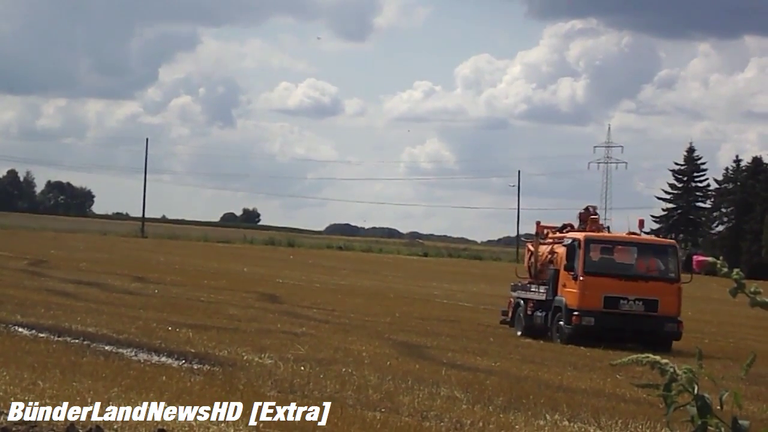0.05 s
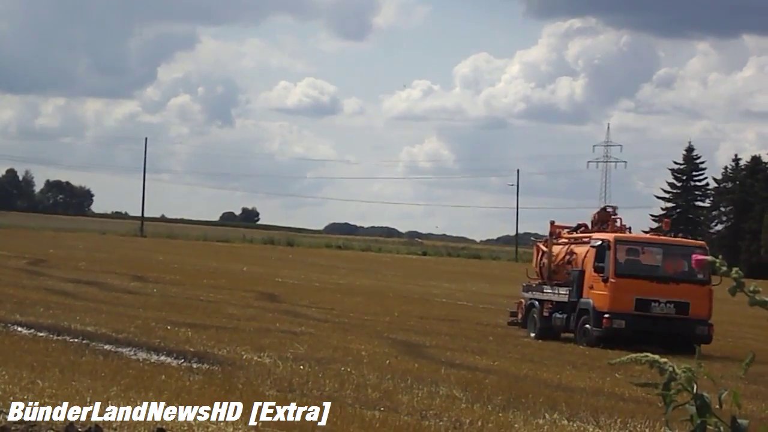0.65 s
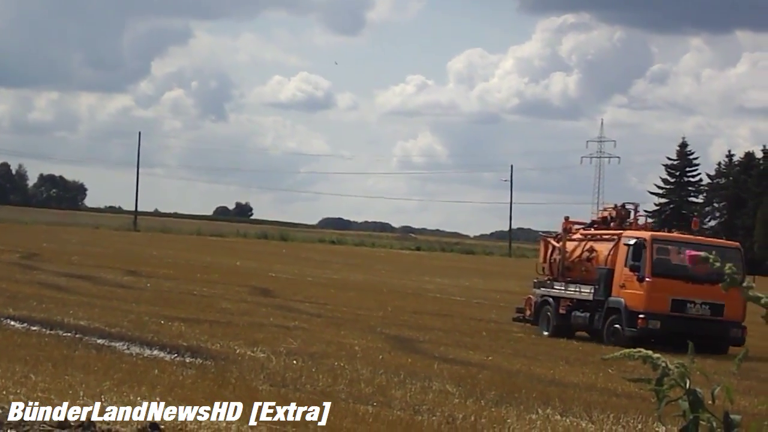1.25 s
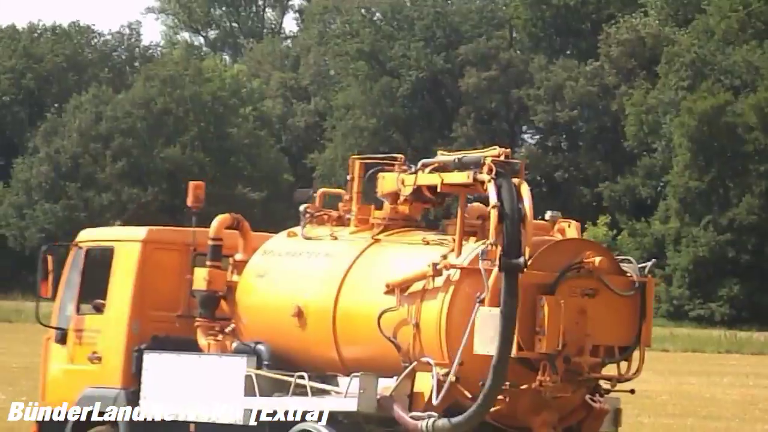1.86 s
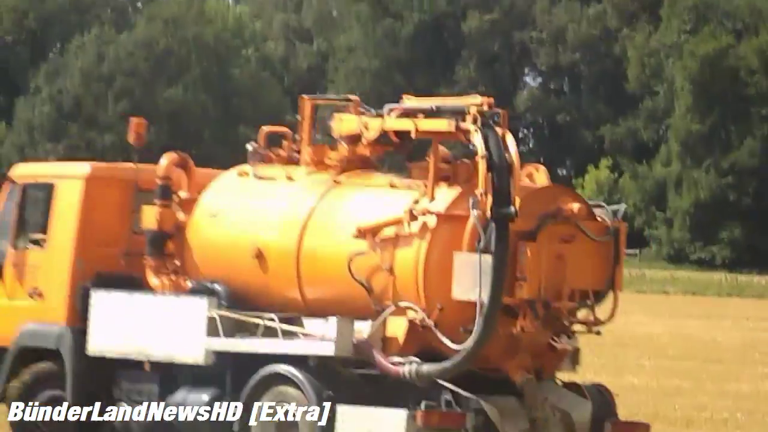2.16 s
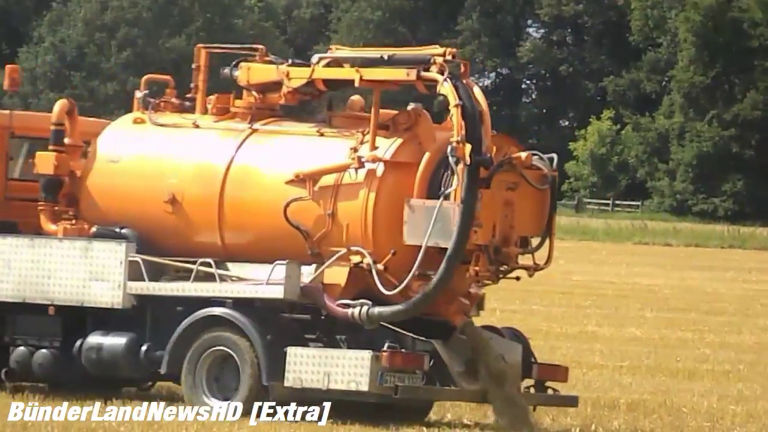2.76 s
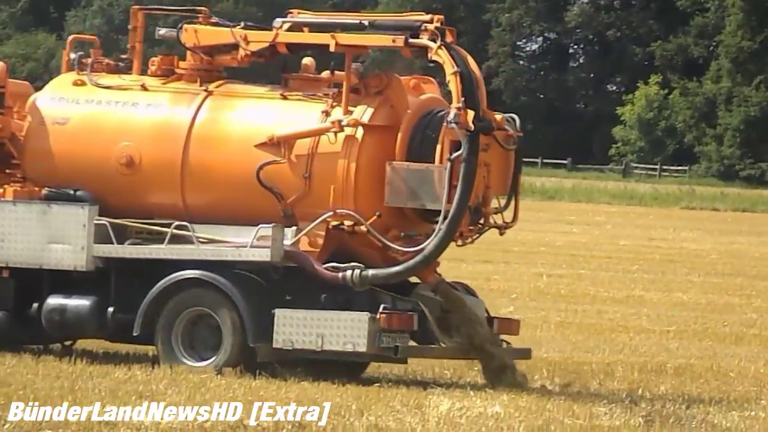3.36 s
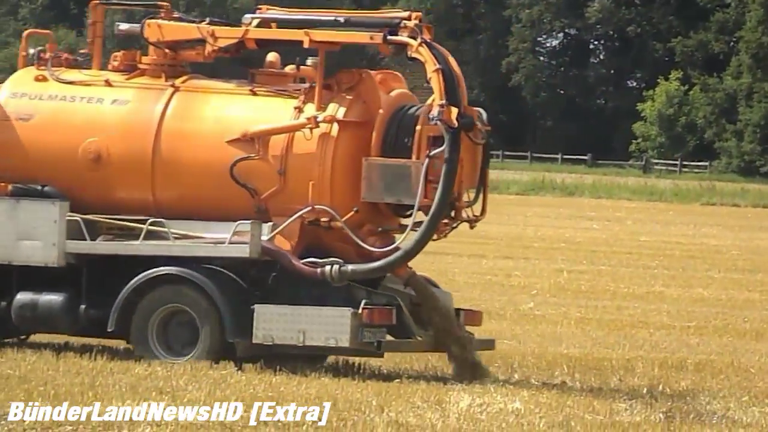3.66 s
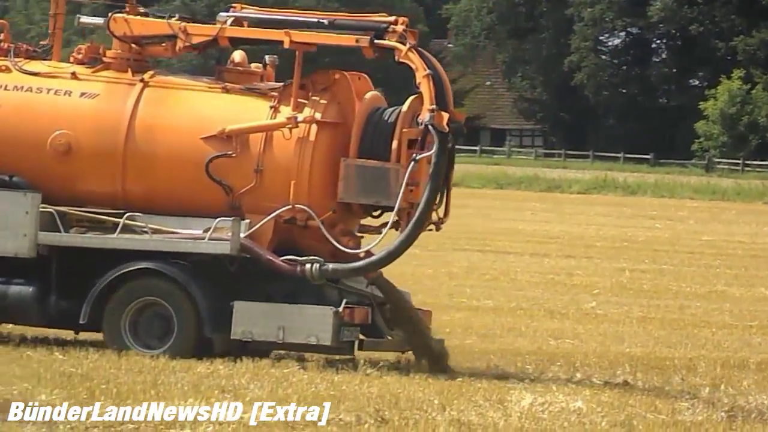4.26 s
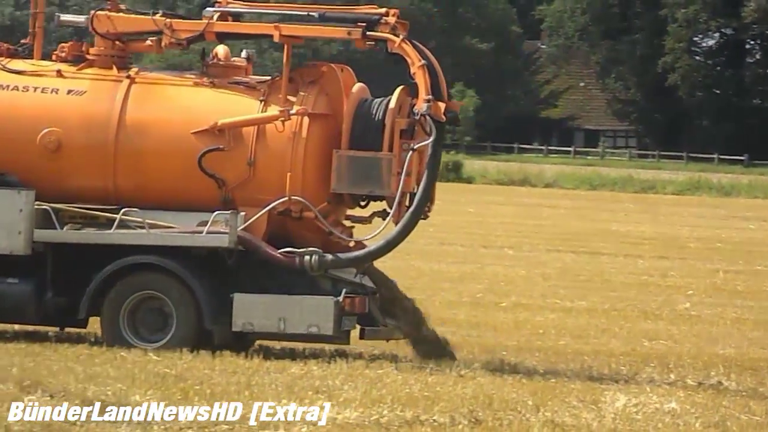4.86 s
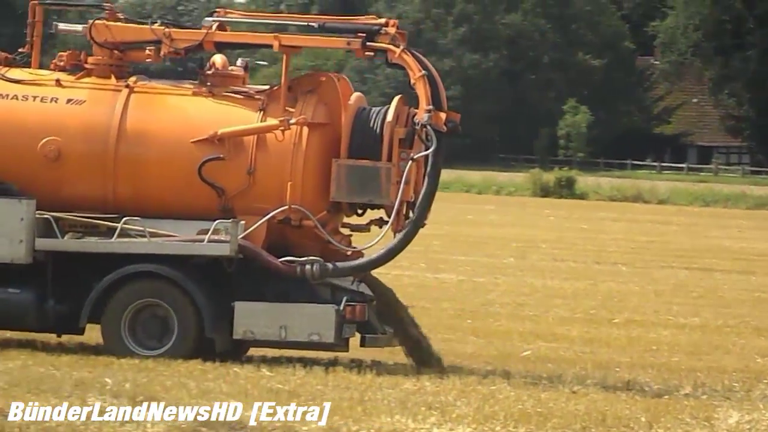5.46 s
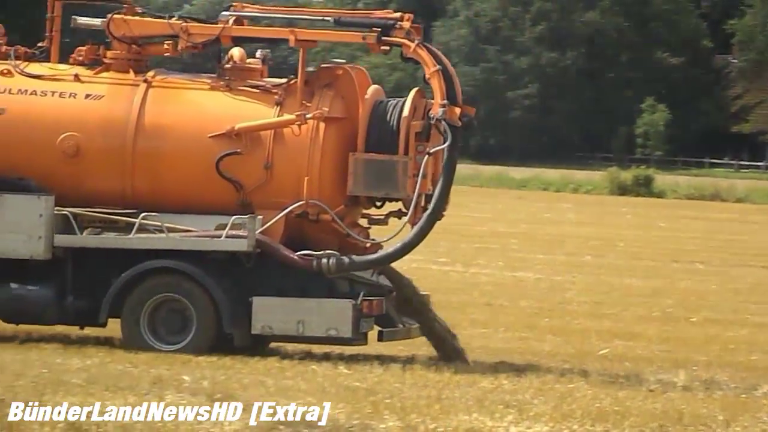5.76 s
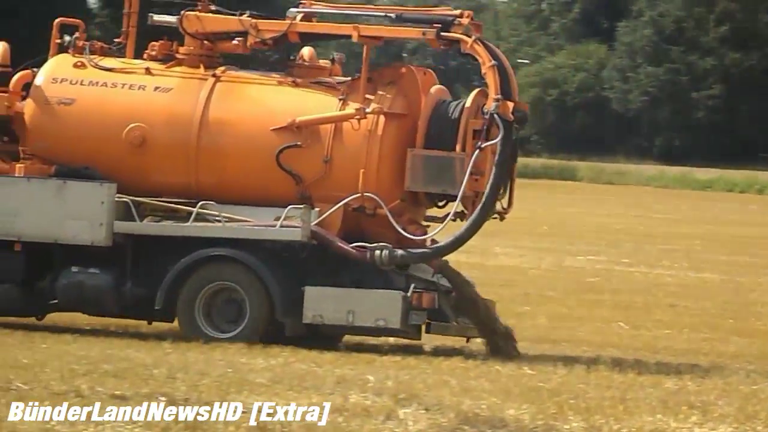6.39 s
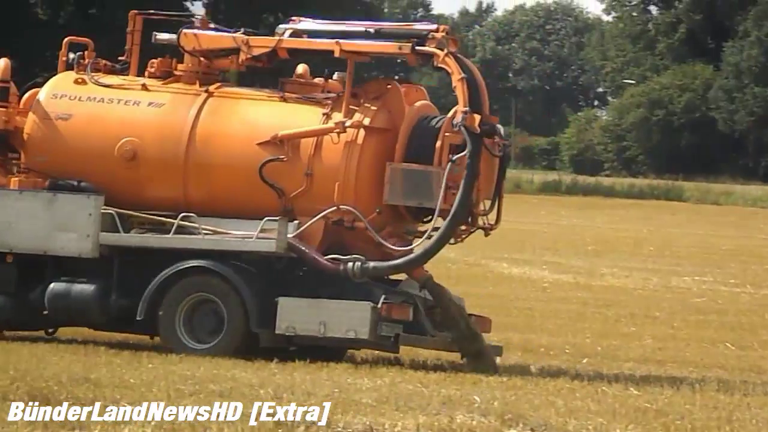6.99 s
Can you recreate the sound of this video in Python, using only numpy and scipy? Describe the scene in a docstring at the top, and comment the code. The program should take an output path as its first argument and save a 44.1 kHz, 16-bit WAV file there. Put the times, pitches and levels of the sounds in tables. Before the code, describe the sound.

A diesel tanker truck drones far across a field, then after a brief silence runs close by, rattling and splashing slurry while crickets rasp.

```python
"""Diesel engine of a slurry tanker crawling over stubble: heard from afar, then, after 0.5 s of silence, near.
Exhaust drones on multiples of the crank speed; firings knock the block and rattle loose metal.
The geared vacuum pump hums as its vanes chop the air; rubbing parts squeal.
Near, slurry splashes on the ground. Bush-crickets rasp their wings in the grass close by."""
import sys
import numpy as np
from scipy import signal
from scipy.fft import rfft, irfft, next_fast_len
from scipy.io import wavfile

SR = 44100
rng = np.random.default_rng(int(sys.argv[2]) if len(sys.argv) > 2 else 0)


def dump(signal):
    """Clip the signal to [-1, 1] and save it as 16-bit WAV at the path in sys.argv[1]."""
    limited = np.clip(np.atleast_2d(signal).T, -1, 1)
    pcm = np.round(limited * 32767).astype(np.int16)
    wavfile.write(sys.argv[1], SR, pcm)


N = 318843
T, HZ = np.arange(N) / SR, np.fft.rfftfreq(N, 1 / SR)
FAR_S, NEAR_S = (0, 1.7745), (2.2745, 7.24)  # start, end
PASS_MID_S, PASS_LENGTH_S = 4.24, 1.27
CRUISE_REV_PER_S, PUMP_RATIO = 23, 5.625
FITTING_HZ, FITTING_WIDTH_HZ = 5255, 169

# crank speed, sagging and recovering on soft ground: t/s, speed/(rev/s)
CRANK_SPEED = [(0, 22.9), (0.5, 22.95), (0.75, 23.15), (1.5, 23.25), (2.3, 23.05), (2.82, 22.98),
               (3.15, 23.5), (3.52, 22.5), (3.87, 23.55), (4.05, 23.7), (4.92, 22.45), (5.45, 22.65),
               (5.97, 22.42), (6.5, 23.02), (6.68, 23.42), (7.05, 23.06)]
# exhaust tones: order (multiple of crank speed)
ORDERS = [6, 7, 8, 9.5, 10.5, 12, 13, 16, 20, 22, 24, 26.5, 29, 30, 34]
# per order: level/dB
FAR_DRONE_DB = [-77, -89, -85.5, -68, -77, -64.5, -79.5, -72, -61, -76, -66.5, -73, -58, -71.5, -64.5]
NEAR_DRONE_DB = [-71.5, -74, -73, -64, -83, -79, -60.5, -77, -69.5, -59.5, -61, -69, -70, -63, -56]
# exhaust tone surges: order, mid/s, length/s, gain/dB
DRONE_SURGES = [(29, 1.2, 1.2, 7), (34, 1.15, .5, 11), (30, 3, 0.33, 16), (24, 4.4, 0.48, 13.5),
                (30, 4.8, 0.54, 12), (24, 8.4, .45, 15), (13, 7.2, 1.1, 6)]
# roar envelope before trim: t/s, low/dB, clatter/dB
FAR_ROAR = [(0.0, -44.5, -43), (0.866, -47, -42.5), (1.208, -45.5, -41.5), (1.75, -47, -42)]
NEAR_ROAR = [(2.28, -41, -38), (2.6, -40, -38.5), (3.2, -39.5, -37.5), (3.6, -37.5, -38), (4.05, -40, -39),
             (4.5, -37.5, -38), (5.75, -38, -37), (6.05, -41.5, -37), (6.27, -38, -37.5),
             (7.23, -40.5, -37.5)]
# roar spectrum: f/Hz, relative level/dB
FAR_SPECTRUM = [(25, -48.5), (60, -38), (90, -22.5), (150, -15.5), (260, 1.5), (420, 0), (660, 6),
                (830, 1.5), (970, -4.5), (1650, 0), (2550, -3), (3200, -9), (4700, -14.5), (9000, -20),
                (16000, -13)]
NEAR_SPECTRUM = [(25, -51), (60, -45), (90, -31), (150, -20), (270, -5.5), (410, -3.5), (520, 3), (720, 5),
                 (900, -7.5), (1100, 3.5), (2000, 0.5), (3100, -2.5), (5500, -7.5), (9000, -15.5),
                 (16000, -13.5)]
# body resonances in the roar: f/Hz, width/Hz, gain/dB
FAR_BODY = [(1280, 180, 1), (1384, 87, -5), (1840, 210, 1), (1950, 32, -10), (2564, 110, 1.5),
            (4000, 175, 2)]
NEAR_BODY = [(664, 18, 1), (1200, 180, 3.5), (1247, 127, -7.5), (1434, 65, 4.5), (1970, 180, 2),
             (2270, 130, -0.5), (3600, 106, 6.5), (3830, 200, -7), (4000, 150, 6)]
# left-right likeness of the truck: f/Hz, coherence
FAR_COHERENCE = [(130, .998), (290, 1), (640, 0.9), (1410, 0.69), (3100, 0), (7000, 0.12), (15000, 0)]
NEAR_COHERENCE = [(130, .999), (290, 1), (640, 0.99), (1410, 0.91), (3100, 0.73), (7000, 0.53),
                  (15000, 0.6)]
# resonances rung by the firings: f/Hz, width/Hz, relative level/dB
BLOCK_MODES = [(1560, 280, -18.5), (1940, 200, -0.5), (2550, 82, 22), (3730, 190, -22), (4360, 680, -13)]
BOOM_MODES = [(470, 123, 0)]
RASP_MODES = [(2490, 180, 0)]
SCRAPE_MODES = [(3700, 130, -4), (3980, 95, 1), (4540, 90, 5), (7140, 200, -11)]
# block knock and panel rattle swells: mid/s, length/s, gain/dB
KNOCK_SWELLS = [(2.3, 0.6, -2), (2.72, 0.25, 0), (3.4, .9, -5), (3.8, .16, 1.5), (4.0, 0.5, -5),
                (5.42, .25, -3.5), (6.25, 0.61, 0), (6.76, 0.6, 2.5)]
PANEL_SWELLS = [(1.17, .4, 5.5), (1.41, .2, 6)]
# envelopes of slurry thud, broad rasp, metal scrape, loose fitting: t/s, level/dB
BOOM_LEVEL = [(3.3, -70), (3.44, -46), (3.55, -45), (3.66, -48), (3.8, -70)]
RASP_LEVEL = [(2.3, -65), (2.42, -45), (2.54, -43), (2.62, -43.5), (2.85, -48), (3.3, -49), (3.9, -60),
              (6.3, -58), (6.78, -49), (7.2, -58)]
SCRAPE_LEVEL = [(5.55, -80), (5.68, -44), (5.82, -43), (5.91, -44), (5.95, -80)]
FITTING_LEVEL = [(2.3, -53), (4.2, -57), (4.55, -48.5), (5.05, -52), (5.3, -47), (5.75, -48.5), (6.0, -60),
                 (6.28, -50), (6.55, -55.5), (7.2, -54)]
# hardest strikes of the fitting: t/s, f/Hz, relative level/dB
CLINKS = [(3.487, 5150, -39), (4.370, 5260, -46), (4.500, 5100, -45), (4.593, 5280, -46),
          (4.792, 5200, -47), (4.966, 5240, -43), (5.144, 5260, -45), (5.256, 5140, -43),
          (5.321, 5320, -40), (5.409, 5130, -46), (5.540, 5310, -50), (5.586, 5170, -41),
          (5.786, 5260, -37), (6.072, 5170, -43), (6.228, 5200, -41), (6.312, 5180, -45)]
# pump hum: harmonic, far/dB, before pass/dB, after pass/dB, speed slope/(dB per rev/s)
PUMP_HARMONICS = [(2, -63, -56, -56, 5.5), (3, -77, -51, -67, -6), (4, -61, -56, -46.5, 2),
                  (5, -62.5, -47, -47, -1.5)]
# hum surges and dips: harmonic, mid/s, length/s, gain/dB
PUMP_SURGES = [(2, 2.9, 0.37, -2), (2, 5.95, 0.41, -15), (2, 6.95, 0.93, 4), (3, 3.45, 0.82, -19),
               (4, 2.35, 0.34, 9), (4, 3.36, 0.26, 13.5), (4, 4.4, 1, -4), (4, 7.15, 0.34, -12),
               (5, 2.27, 0.26, -12), (5, 2.78, 0.85, 6), (5, 4.5, 0.23, 8), (5, 3.85, 0.44, -8.5),
               (5, 4.2, 0.19, 11), (5, 4.1, .16, 10), (5, 6.4, .2, 4.5), (5, 9.6, 0.18, -7),
               (5, 6.7, 0.28, 8.5), (5, 7.1, 0.69, -6)]
# machinery whines: t/s, length/s, f/Hz, glide/(Hz/s), width/Hz, level/dB
SQUEALS = [(0.02, 0.94, 1270, 0, 9, -53.5), (0.04, 0.82, 1712, 0, 10, -54), (0.81, 0.07, 685, 0, 20, -46.5),
           (1.03, 0.24, 1600, 0, 25, -52), (1.1, 0.36, 1675, 0, 20, -53), (3.2, .5, 396, -52, 3, -46.5),
           (3.47, 0.3, 6600, 0, 302, -51), (5.682, .1, 8600, 0, 201, -53), (6.11, 0.3, 1416, 0, 12, -47.5),
           (6.14, .3, 1324, 0, 12, -54)]
# slurry gushes: mid/s, length/s, gain/dB
GUSHES = [(2.62, 0.55, 2.5), (3.52, 0.27, 1.5), (3.82, 0.17, 3), (4.12, 0.36, -1.2), (4.42, 0.38, 1),
          (4.75, 0.69, 2.5), (5.05, .2, -1), (5.6, 1, 2)]
# splash and bush-cricket spectra: f/Hz, relative level/dB
SPLASH_SPECTRUM = [(300, -53), (1500, 4.5), (3000, 3.5), (5500, 4), (8000, 2), (11000, -3.5), (16000, -5)]
FAR_SONG = [(3000, -51), (9000, -23.5), (12000, -20), (13500, -8), (14700, -2.5), (15700, 6)]
NEAR_SONG = [(3000, -43), (9000, -32), (12300, -11.5), (13500, -6), (14500, 1), (15700, -0.5)]
# strokes of a small insect: mid/s, length/s, level/dB
CHIRPS = [(0.01, 0.073, -54.5), (.095, .06, -53.5), (.187, .035, -53), (.262, .07, -52.5),
          (.355, 0.044, -52.5)]


def exhaust_drone(crank_rev, levels_db, waver_db, jitter_rad):
    """Tones on crank orders; uneven combustion makes each waver."""
    out = np.zeros(N)
    for order, db in zip(ORDERS, levels_db):
        level = amp(db + surges_db(DRONE_SURGES, order) + waver_db * wander(5.9))
        out += level * np.sin(2 * np.pi * order * crank_rev + jitter_rad * wander(22))
    return np.sqrt(2) * out


def engine_roar(crank_rev, levels, spectrum, body, coherence, low_trim_db, high_trim_db, throb, grain_db):
    """Lumpy rumble and exhaust rush below; clatter above, throbbing at two firings a turn."""
    body_db = sum(db / (1 + (2 * (HZ - hz) / width_hz) ** 2) for hz, width_hz, db in body)
    noise = filtered(stereo(rng.standard_normal((2, N)), coherence), amp(per_bin(spectrum) + body_db))
    low = filtered(noise, lowpass(930, 8))
    rush = low / band_rms(noise, 200, 900)
    clatter = (noise - low) / band_rms(noise, 1000, 3000)
    rumble = filtered(rush, lowpass(110, 8))
    rush += rumble * (amp(-2.5 + 4 * wander(9)) - 1)
    beat = 1 + throb * np.cos(2 * np.pi * (2 * crank_rev - .2))
    clatter *= unit_rms(beat * amp(grain_db * wander(180)))
    return rush * amp(curve(levels) + low_trim_db) + clatter * amp(curve(levels, column=2) + high_trim_db)


def knock(crank_rev, modes, level_db, decay_cycles, floor):
    """Each firing is a noise burst of random strength that rings the modes."""
    cycles = 2 * crank_rev
    strength = rng.uniform(.6, 1.4, N)[cycles.astype(int)]
    bursts = (floor + strength * np.exp(-(cycles % 1) / decay_cycles)) * rng.standard_normal((2, N))
    response = sum(amp(db) / (1 + 1j * (HZ - hz) / width_hz) ** 2 for hz, width_hz, db in modes)
    return amp(level_db) * unit_rms(filtered(stereo(bursts, NEAR_COHERENCE), response))


def block_knock(crank_rev, far_db=-61, near_db=-43.5, drift_hz=18):
    """Firings ring the block; pitch drifts as the metal flexes."""
    level_db = np.where(T < NEAR_S[0], far_db, near_db + swells(KNOCK_SWELLS))
    ring = knock(crank_rev, BLOCK_MODES, level_db, decay_cycles=.2, floor=.58)
    drift_cycles = np.cumsum(drift_hz * wander(7)) / SR
    return (signal.hilbert(ring) * np.exp(2j * np.pi * drift_cycles)).real


def slurry_thud(crank_rev):
    """A low thud swells once as the slurry gushes."""
    boom = knock(crank_rev, BOOM_MODES, curve(BOOM_LEVEL), decay_cycles=.4, floor=.6)
    return filtered(boom, 1 - lowpass(280, 6))


def pump_hum(crank_rev, flutter=.3, jitter_rad=1.28, drift_rad=.073):
    """Vanes chop the air into fluttering harmonics; the low ones jitter most."""
    overspeed = curve(CRANK_SPEED) - CRUISE_REV_PER_S
    out = np.zeros(N)
    for k, far_db, before_db, after_db, slope in PUMP_HARMONICS:
        near_db = passing_db(before_db, after_db) + slope * overspeed + surges_db(PUMP_SURGES, k)
        level = amp(np.where(T < NEAR_S[0], far_db, near_db)) * (1 + flutter * wander(30))
        phase_rad = 2 * np.pi * k * PUMP_RATIO * crank_rev
        out += level * np.sin(phase_rad + jitter_rad / k * wander(14) + drift_rad * k * wander(4))
    return np.sqrt(2) * out


def slurry(drops_per_s=3000, hiss=1.4, waver_db=1.4, echo_s=.00156):
    """Splats of unequal size over the hiss of the gushing stream."""
    sizes = amp(2 * np.minimum(rng.exponential(1, (2, N)), 4))
    drops = sizes * rng.choice([-1, 1], (2, N)) * (rng.random((2, N)) < drops_per_s / SR)
    splash = unit_rms(drops) + hiss * rng.standard_normal((2, N))
    comb = 1 + .28 * np.exp(-2j * np.pi * HZ * echo_s)  # nearby reflection
    splash = filtered(stereo(splash, NEAR_COHERENCE), amp(per_bin(SPLASH_SPECTRUM)) * comb)
    level_db = passing_db(-45.5, -50) + swells(GUSHES) + waver_db * wander(22)
    return splash / band_rms(splash, 6000, 12000) * amp(level_db)


def fitting_rattle(crank_rev):
    """A loose fitting jingles in fits as the truck rocks."""
    fits = unit_rms(np.clip(1 + .3 * wander(14), .2, 1.6))
    modes = [(FITTING_HZ, FITTING_WIDTH_HZ, 0)]
    return fits * knock(crank_rev, modes, curve(FITTING_LEVEL), decay_cycles=.34, floor=.16)


def fitting_clinks(rise_s=.0027, decay_s=.016):
    """The fitting strikes, chatters and rings briefly."""
    chatter_cycles = np.cumsum(.5 * FITTING_WIDTH_HZ * wander(203)) / SR
    out = np.zeros(N)
    for start_s, hz, db in CLINKS:
        age_s = np.maximum(T - start_s, 0)
        envelope = np.minimum(age_s / rise_s, 1) * np.exp(-age_s / decay_s)
        out += 2 * amp(db) * envelope * np.sin(2 * np.pi * (hz * age_s + chatter_cycles))
    return out


def panel_rattle(crank_rev, hz=1630, width_hz=74, base_db=-53):
    """A panel rattles with the firings and swells twice."""
    level_db = base_db + swells(PANEL_SWELLS)
    return knock(crank_rev, [(hz, width_hz, 0)], level_db, decay_cycles=.5, floor=.76)


def rasp_and_scrape(crank_rev):
    """Engine-shaken: a broad rasp swelling twice, one brief metal scrape."""
    rasp = knock(crank_rev, RASP_MODES, curve(RASP_LEVEL), decay_cycles=.3, floor=.7)
    return rasp + knock(crank_rev, SCRAPE_MODES, curve(SCRAPE_LEVEL), decay_cycles=.48, floor=.56)


def squeals():
    """Rubbing parts excite narrow resonances: rough, unsteady tones; the low gliding tone is the pump's third
    harmonic bending down."""
    out = np.zeros(N)
    for start_s, length_s, hz, glide_hz_per_s, width_hz, db in SQUEALS:
        envelope = np.sqrt(abs(np.sin(np.pi * np.clip((T - start_s) / length_s, 0, 1))))
        roughness = 1 + .5 * wander(2 * width_hz)
        pitch_hz = hz + glide_hz_per_s * (T - start_s) + width_hz * wander(2 * width_hz)
        out += amp(db) * envelope * roughness * np.sin(2 * np.pi * np.cumsum(pitch_hz) / SR)
    return np.sqrt(2) * out


def crickets(level_db, song, stroke_cycles, chorus, coherence, right_db, wing_hz=103.6):
    """One close insect rasps at each wing stroke; the chorus blurs into hiss."""
    wing_cycles = np.cumsum(wing_hz * (1 + .003 * wander(6))) / SR
    strokes = np.exp(-((wing_cycles % 1 - .5) / stroke_cycles) ** 2) * amp(1.8 * wander(60))
    buzz = strokes * rng.standard_normal((2, N)) + chorus * rng.standard_normal((2, N))
    buzz = stereo(buzz, [(1, coherence)])  # short waves reach left and right partly out of phase
    buzz = filtered(buzz, amp(per_bin(song))) * amp([[-right_db / 2], [right_db / 2]])
    return buzz / band_rms(buzz, 13000, 16000) * amp(level_db + 1.7 * wander(4))


def insect_chirps(centre_hz=7800, half_width_hz=2200):
    """A small insect rasps faint strokes of dry, high hiss."""
    response = 1 / (1 + ((HZ - centre_hz) / half_width_hz) ** 4)
    hiss = unit_rms(filtered(rng.standard_normal(N), response))
    return hiss * swells([(mid_s, length_s, amp(db)) for mid_s, length_s, db in CHIRPS])


def amp(db):
    """dB to gain."""
    return 10 ** (np.asarray(db) / 20)


def unit_rms(x):
    """Scale to rms 1."""
    return x / np.sqrt(np.mean(x ** 2) + 1e-20)


def band_rms(pair, low_hz, high_hz):
    """In-band rms of the stereo mid."""
    return np.std(filtered(pair.mean(0), (HZ > low_hz) & (HZ < high_hz))) + 1e-12


def curve(rows, column=1):
    """Time table, per sample."""
    rows = np.asarray(rows)
    return np.interp(T, rows[:, 0], rows[:, column])


def passing_db(before_db, after_db):
    """Level ramp as the truck draws past."""
    return before_db + (after_db - before_db) * np.clip((T - PASS_MID_S) / PASS_LENGTH_S + .5, 0, 1)


def swells(rows):
    """Sum of raised-cosine bumps."""
    return sum(height * np.cos(np.pi * np.clip((T - mid_s) / length_s, -.5, .5)) ** 2
               for mid_s, length_s, height in rows)


def surges_db(rows, harmonic):
    """Swells of one harmonic."""
    return swells([row[1:] for row in rows if row[0] == harmonic])


def per_bin(rows):
    """Frequency table, per bin."""
    hz, value = np.transpose(rows)
    return np.interp(np.log(HZ + 1), np.log(hz), value)


def lowpass(corner_hz, order):
    """Low-pass gain per bin."""
    return 1 / (1 + (HZ / corner_hz) ** order)


def filtered(x, gain):
    """Apply a gain per bin."""
    return irfft(rfft(x) * gain, N)


def wander(rate_hz, hop=16):
    """Random drift, rms 1, up to about rate_hz."""
    count = next_fast_len(N // hop + 2)
    hz = np.fft.rfftfreq(count, hop / SR)
    drift = irfft(rfft(rng.standard_normal(count)) / (1 + (hz / rate_hz) ** 4), count)
    return np.interp(T, np.arange(count) * hop / SR, unit_rms(drift))


def stereo(pair, coherence):
    """Mix two independent signals to a given left-right coherence."""
    likeness = np.clip(per_bin(coherence), -1, 1)
    mid = filtered(pair[0], np.sqrt((1 + likeness) / 2))
    side = filtered(pair[1], np.sqrt((1 - likeness) / 2))
    return np.array([mid + side, mid - side])


def gate(start_s, end_s, edge_s=.0013):
    """1 inside the span, 0 outside; fast attack."""
    return np.clip((T - start_s) / edge_s + .3, 0, 1) * (T < end_s)


def scene():
    """The tanker from two places, silence between."""
    crank_rev = np.cumsum(curve(CRANK_SPEED)) / SR
    machine = pump_hum(crank_rev) + squeals() + block_knock(crank_rev)

    far = engine_roar(crank_rev, FAR_ROAR, FAR_SPECTRUM, FAR_BODY, FAR_COHERENCE,
                      low_trim_db=-2.5, high_trim_db=-.5, throb=.046, grain_db=.7)
    far += machine + exhaust_drone(crank_rev, FAR_DRONE_DB, waver_db=2, jitter_rad=.31)
    far += panel_rattle(crank_rev)
    # truck stands to the right: clatter shaded on the left
    far[0] = filtered(far[0], amp(per_bin([(400, .061), (2400, -1.7), (4500, .44)])))
    far += crickets(-44.5 - .5 * T, FAR_SONG, stroke_cycles=.23, chorus=.9, coherence=-.1, right_db=4.5)
    far += insect_chirps()

    near = engine_roar(crank_rev, NEAR_ROAR, NEAR_SPECTRUM, NEAR_BODY, NEAR_COHERENCE,
                       low_trim_db=-1.4, high_trim_db=-1.5, throb=.079, grain_db=1.5)
    near += machine + exhaust_drone(crank_rev, NEAR_DRONE_DB, waver_db=3.5, jitter_rad=.63)
    near += fitting_rattle(crank_rev) + fitting_clinks() + rasp_and_scrape(crank_rev)
    near += slurry_thud(crank_rev) + slurry()
    near += crickets(passing_db(-46, -47.8), NEAR_SONG,
                     stroke_cycles=.07, chorus=.38, coherence=-.45, right_db=-1.6)

    after_s = np.maximum(T - FAR_S[1], 0)
    far_tail = (T >= FAR_S[1]) * (after_s < .05) * amp(-15 - 950 * after_s)
    return far * (gate(*FAR_S) + far_tail) + near * gate(*NEAR_S)


def record(dry):
    """Band limit: 15850 Hz."""
    taps = signal.firwin(601, 15850, window=("kaiser", 8), fs=SR)
    return signal.oaconvolve(dry, taps[None], "same")


dry = scene()
out = record(dry)
dump(out)
```